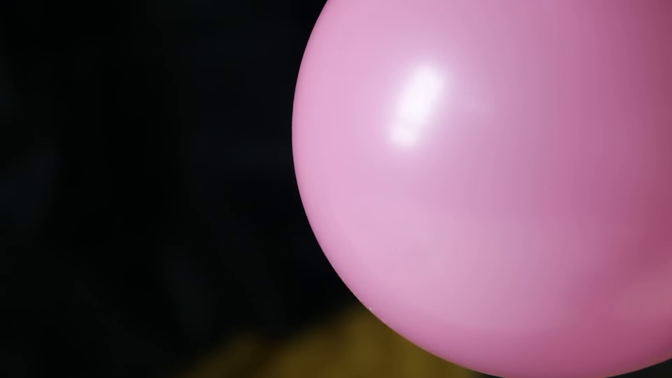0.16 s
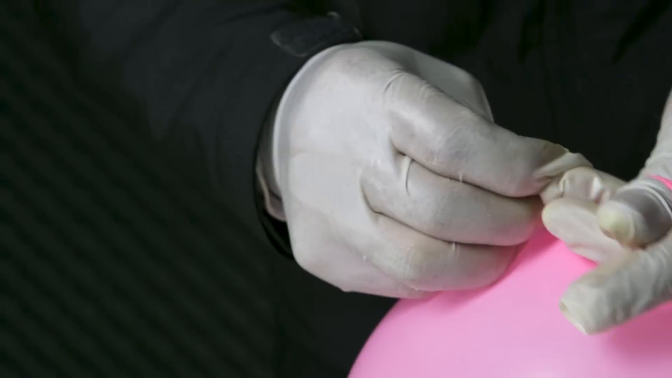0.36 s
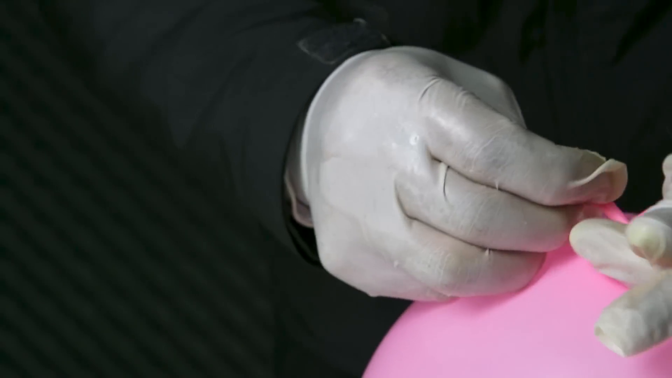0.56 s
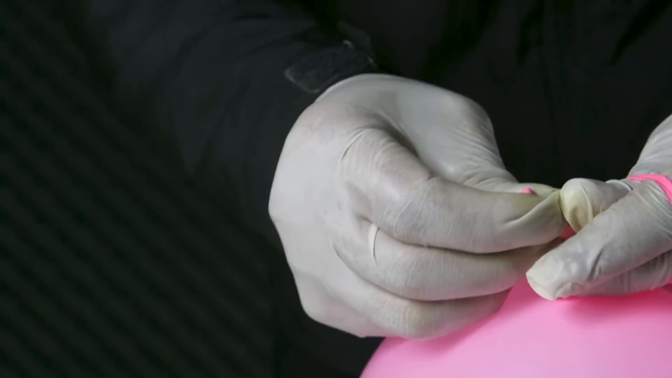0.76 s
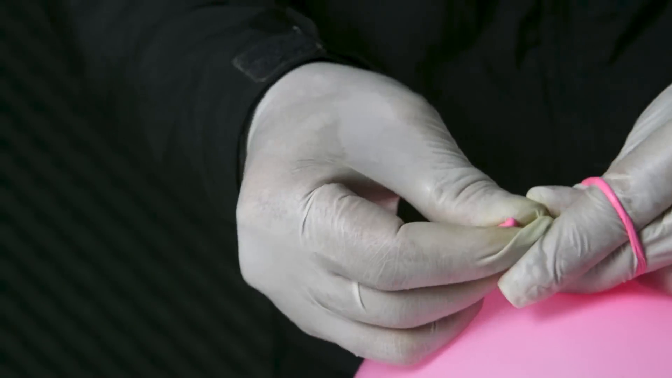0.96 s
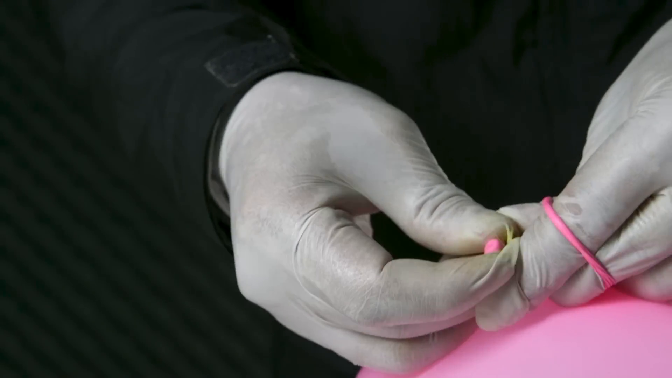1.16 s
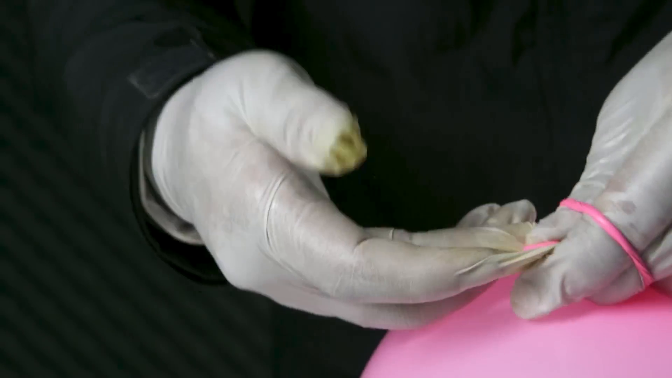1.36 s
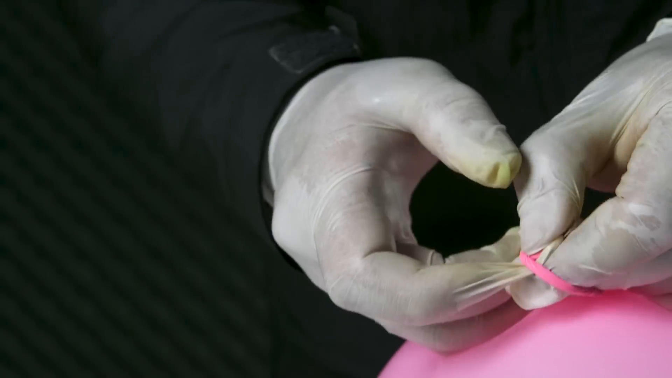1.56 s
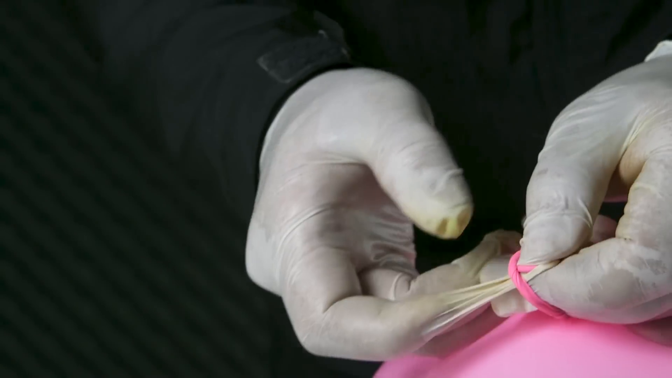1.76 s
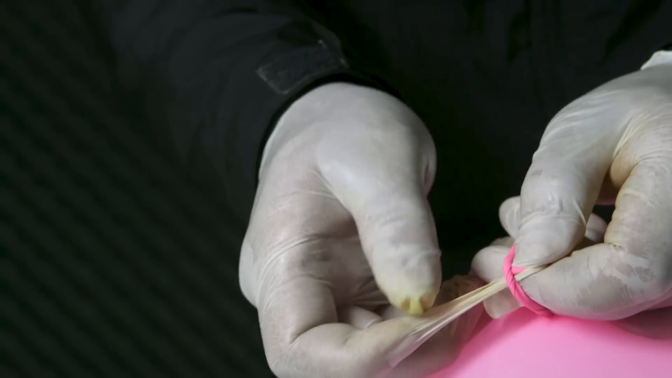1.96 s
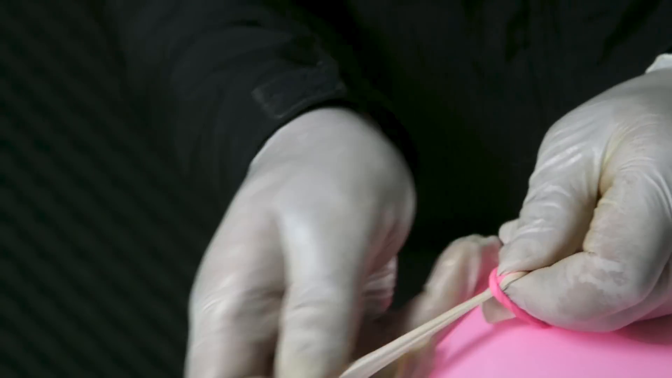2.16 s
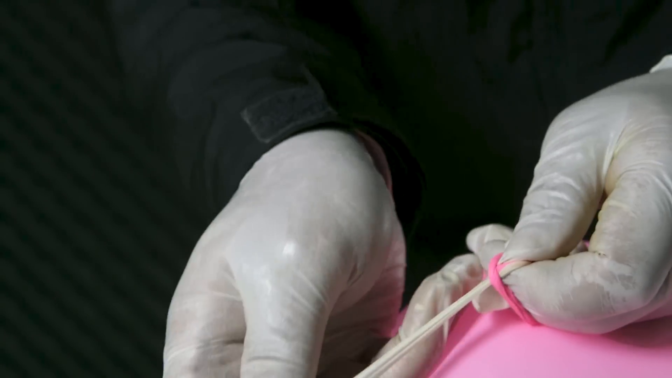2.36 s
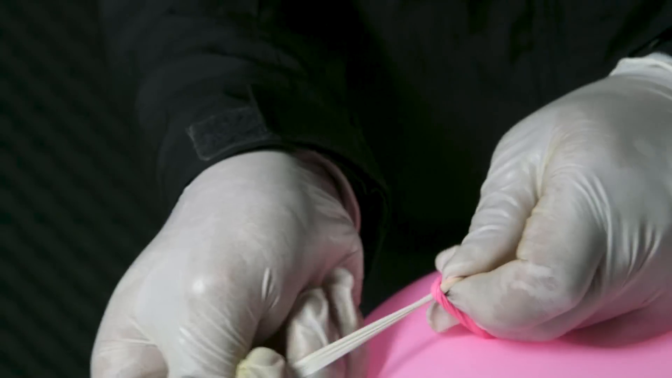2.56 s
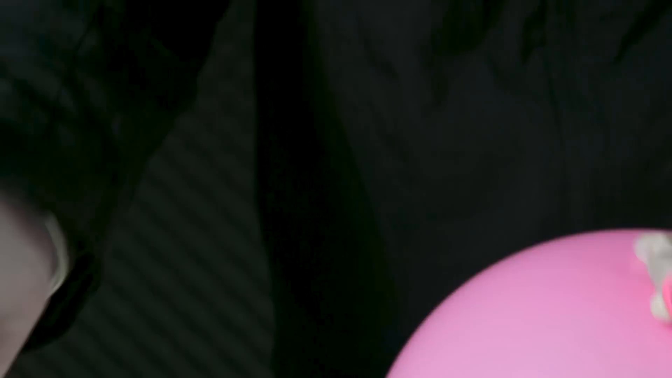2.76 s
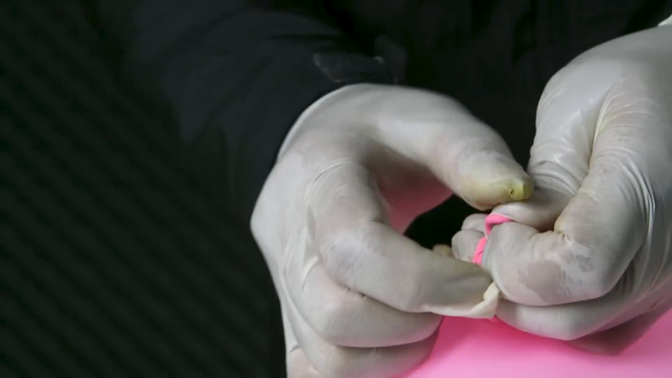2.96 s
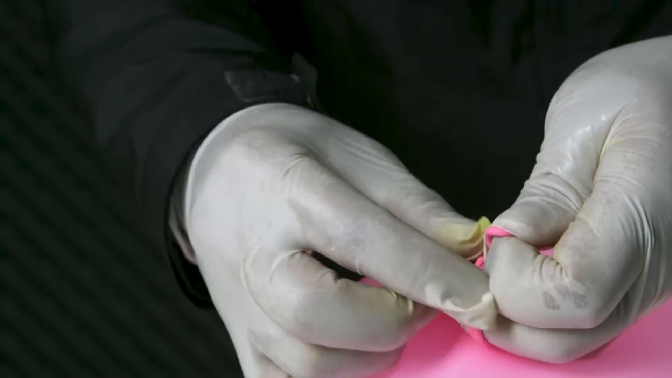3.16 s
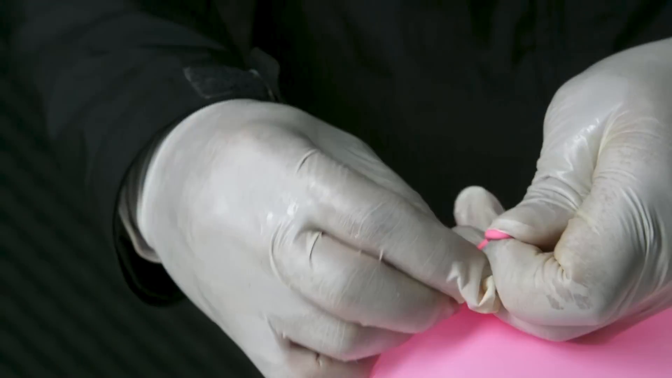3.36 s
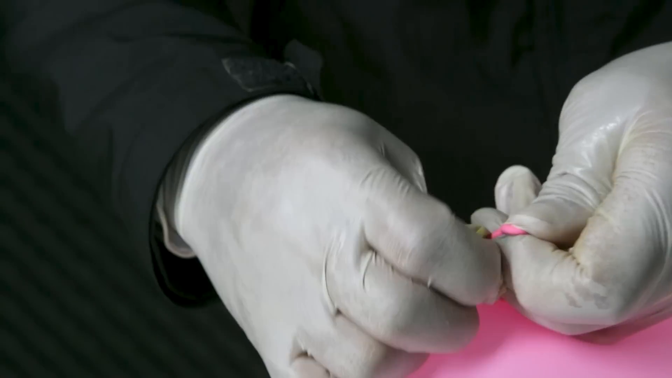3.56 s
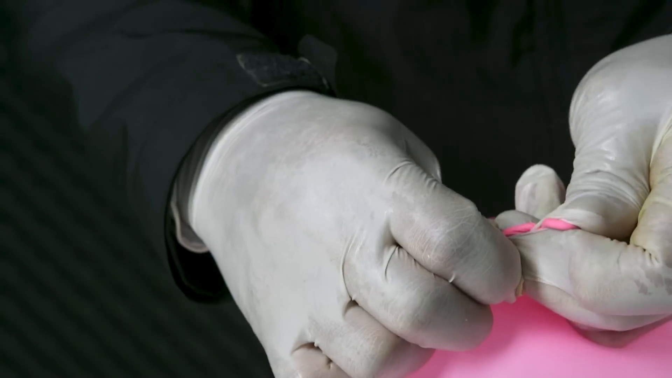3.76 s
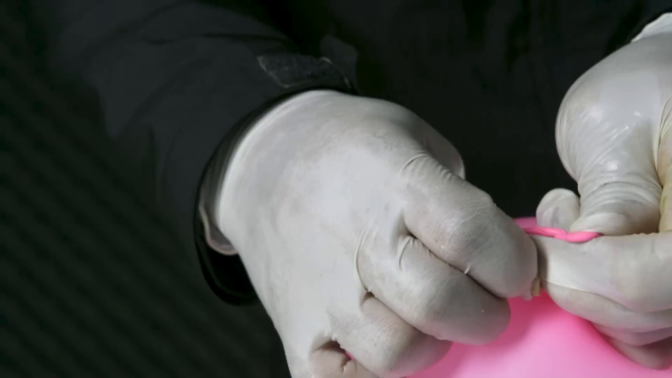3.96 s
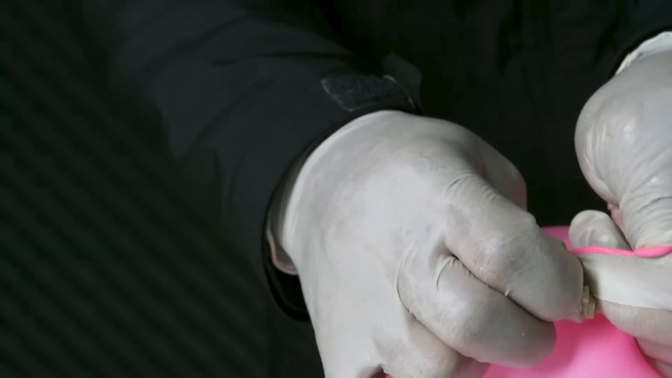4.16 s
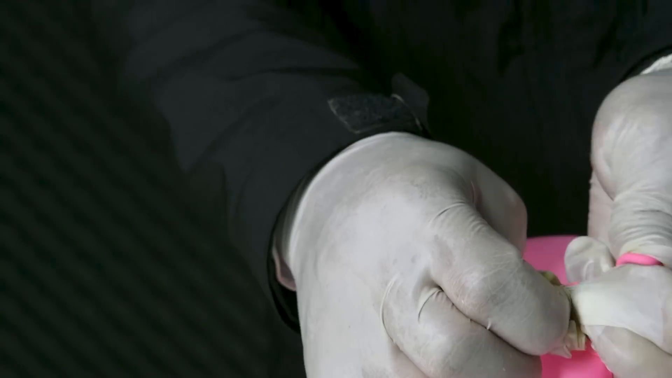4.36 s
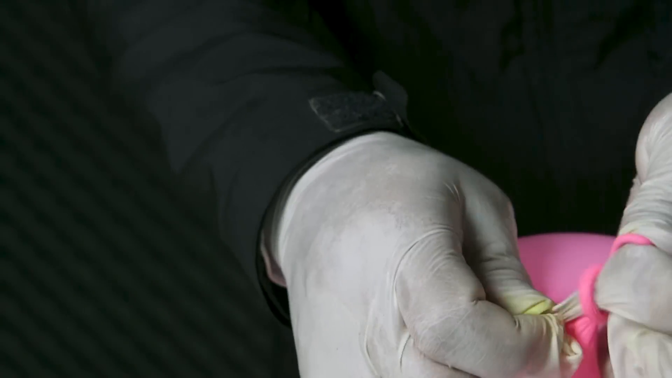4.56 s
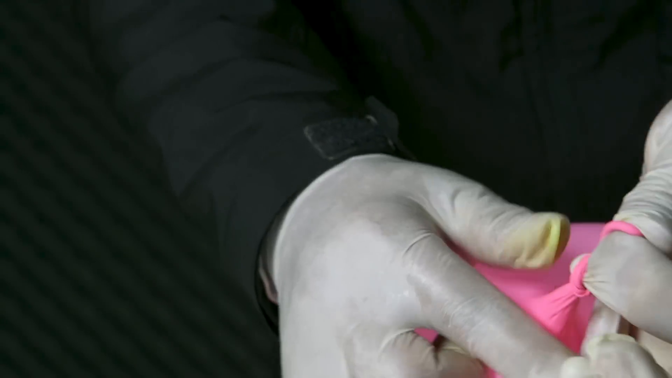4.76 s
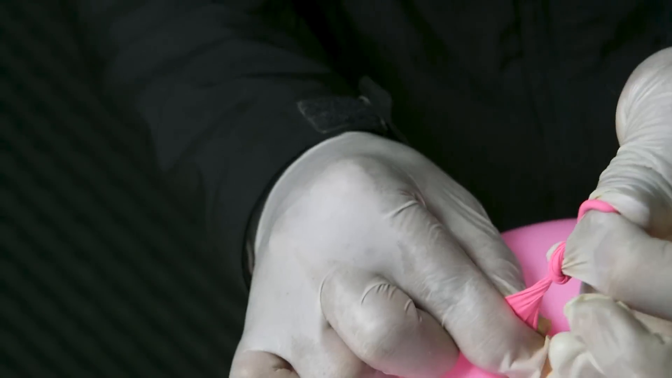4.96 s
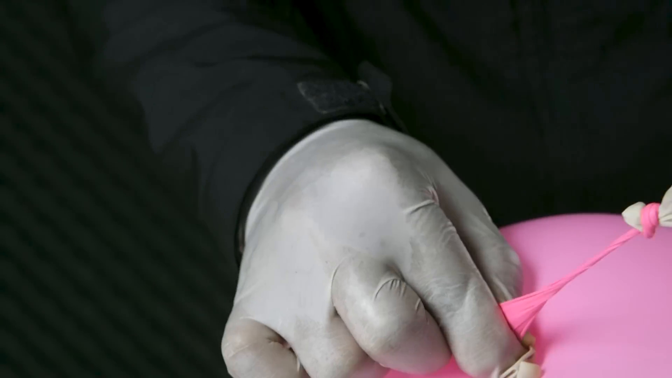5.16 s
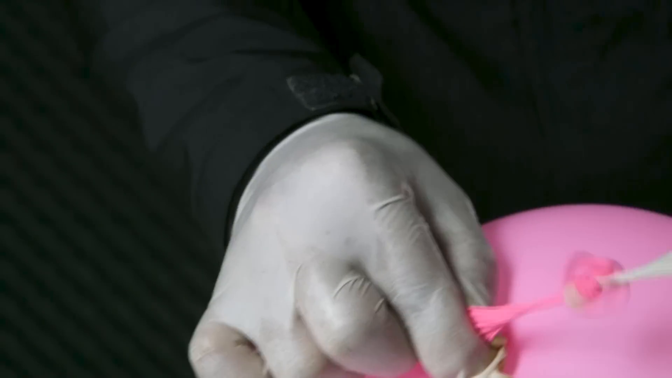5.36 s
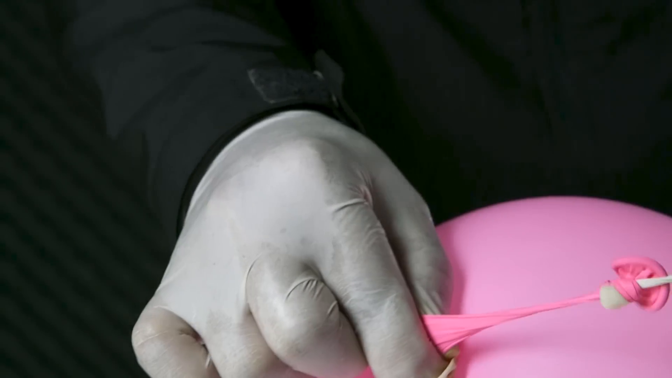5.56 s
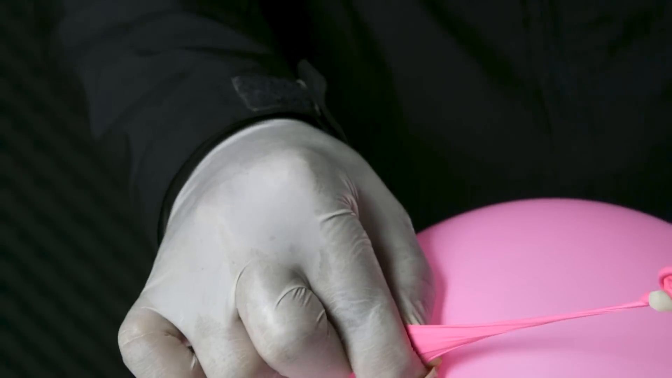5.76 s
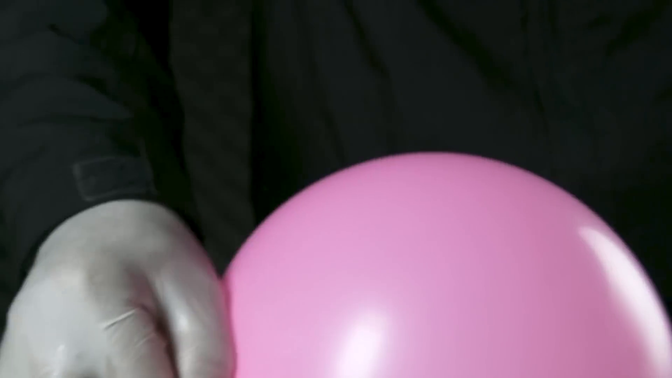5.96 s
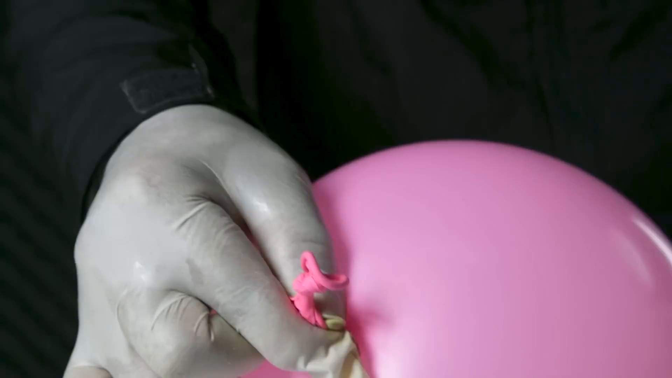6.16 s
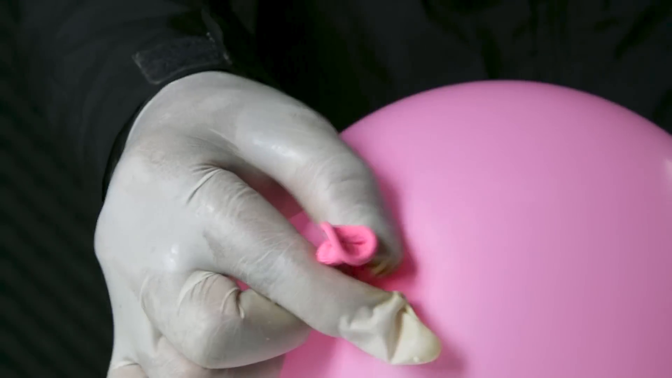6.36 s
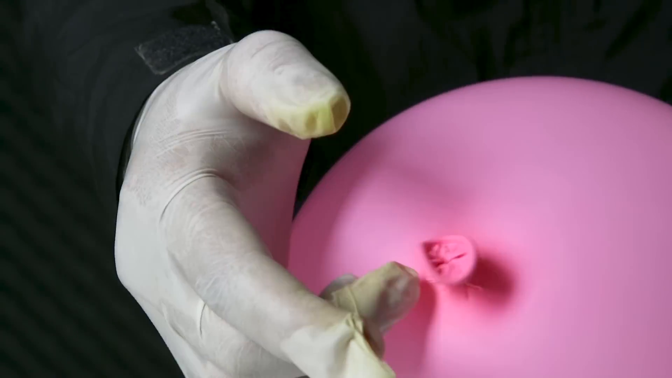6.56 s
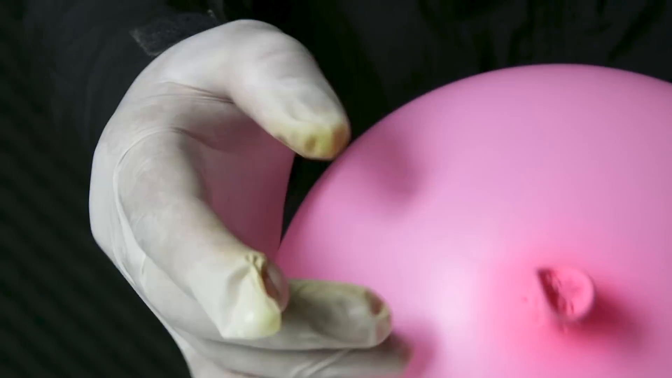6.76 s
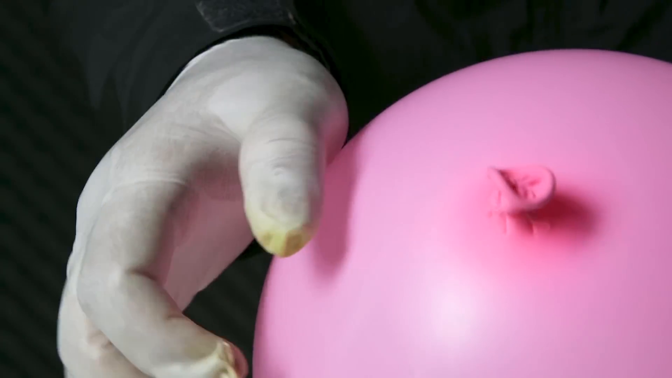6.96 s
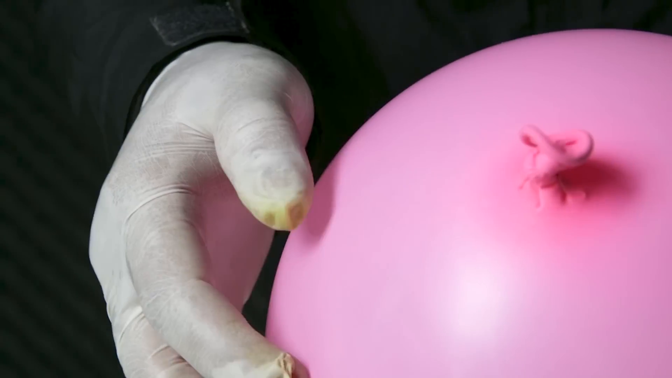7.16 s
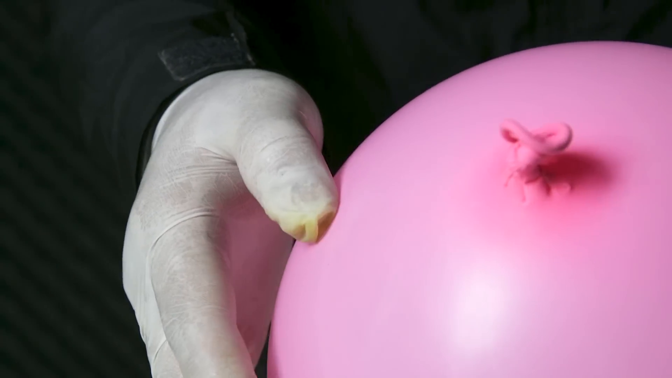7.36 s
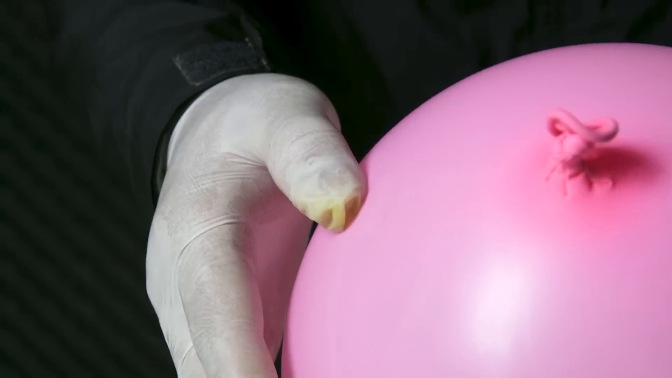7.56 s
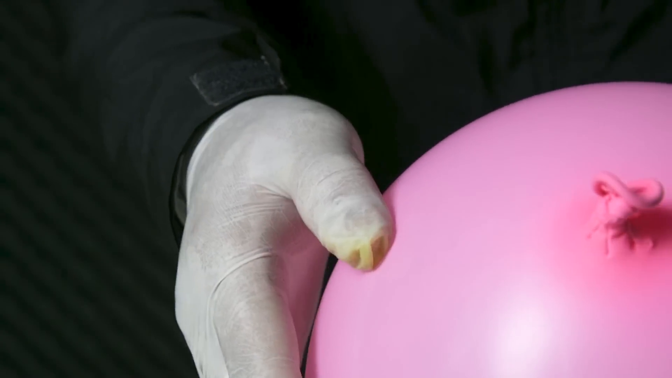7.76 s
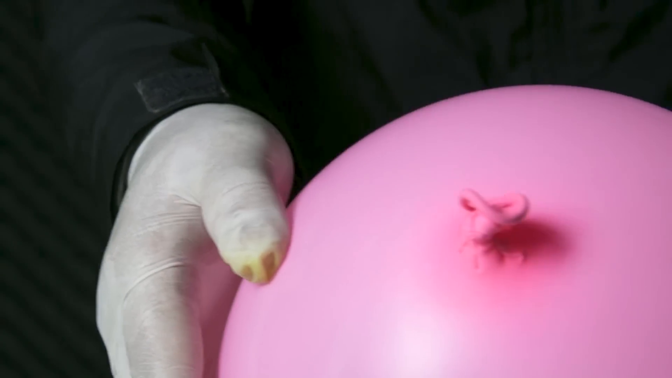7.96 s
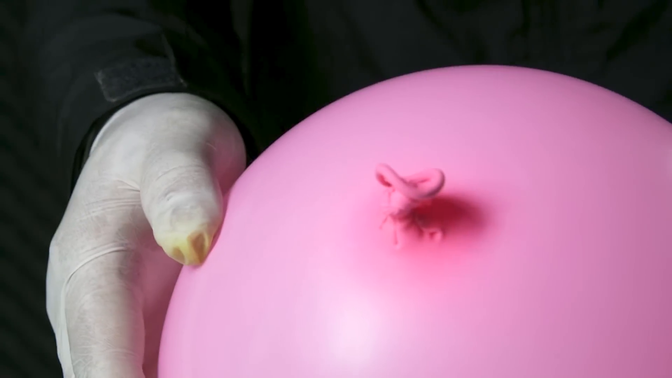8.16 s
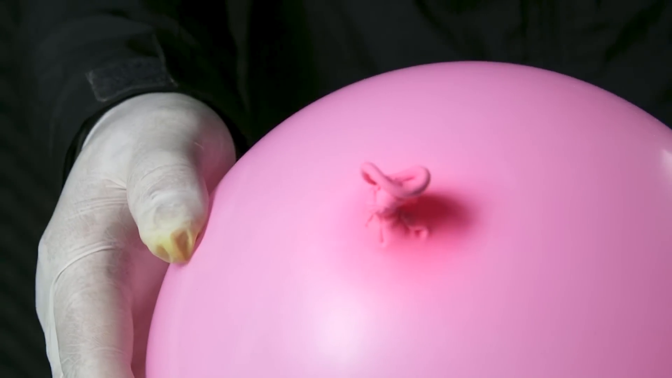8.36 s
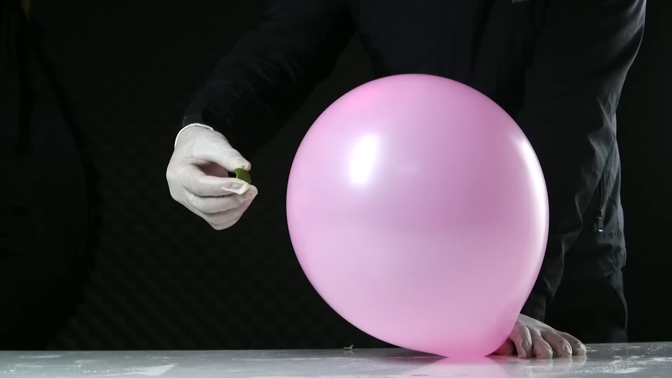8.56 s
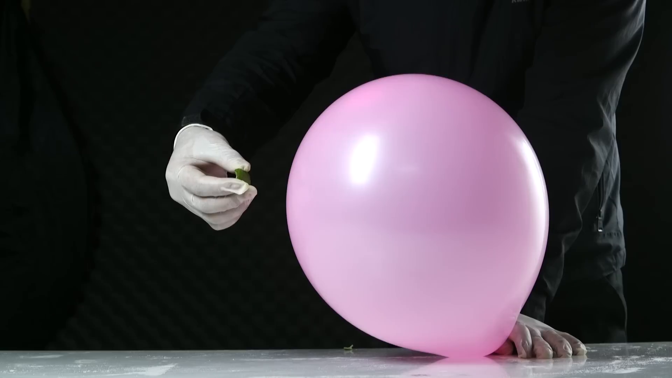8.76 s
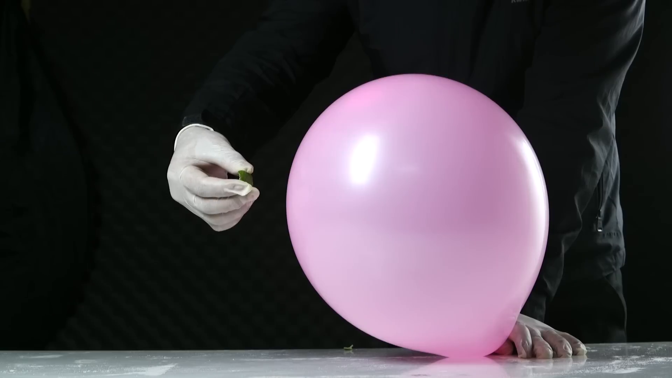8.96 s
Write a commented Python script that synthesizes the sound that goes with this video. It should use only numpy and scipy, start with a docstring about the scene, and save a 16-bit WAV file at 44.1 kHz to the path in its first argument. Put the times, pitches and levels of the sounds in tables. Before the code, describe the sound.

Thin rubber gloves rustle, tick and snap as someone knots a blown-up balloon, heard up close in a quiet, dry room. Scattered cracks build to a busy cluster, with bumps that make the air inside ring briefly. A glove tip whips free with a tiny squeak and a low thump. Fingertips then knock and creak faintly across the tight skin over a soft handling rumble, and everything settles.

```python
"""Tying a balloon in rubber gloves

Hands in thin rubber gloves knot the neck of a blown-up balloon, close by in a small dry room.
The gloves crinkle, peel and snap. Fingers bump and drag on the tight skin, which rings with the air
inside. A glove tip caught in the knot whips free, and the balloon is left bobbing."""
import sys
import numpy as np
from scipy import signal
from scipy.fft import rfft, irfft, next_fast_len
from scipy.io import wavfile
from scipy.ndimage import map_coordinates

SR = 44100
rng = np.random.default_rng(int(sys.argv[2]) if len(sys.argv) > 2 else 0)


def unload_wav(signal):
    """Save mono or channel-first audio to the path in sys.argv[1] as 16-bit WAV at rate SR, clipped to [-1, 1]."""
    wavfile.write(
        sys.argv[1],
        SR,
        np.round(np.clip(np.atleast_2d(signal).T, -1, 1) * 32767).astype(np.int16),
    )


N = 396900  # 9 s

# how hard the fingers work the rubber: t/s, effort/dB
EFFORT = [(0, -58.5), (.36, -72), (.6, -70.5), (1.1, -63.5), (1.55, -63.5), (1.73, -72), (2.38, -72.5),
          (2.72, -62.5), (3.33, -62), (3.58, -69.5), (3.95, -67), (4.18, -70), (4.65, -60), (5.25, -69.5),
          (5.68, -73.5), (6.02, -64.5), (6.3, -72), (6.7, -68), (7.58, -84), (9, -90)]
# how hard they press on the balloon: t/s, pressure/dB
PRESSURE = [(0, -61.5), (.33, -67), (.55, -62), (.8, -68), (1.5, -67.5), (2.05, -70), (2.55, -61),
            (3.45, -66.5), (4.1, -61.5), (4.5, -69), (4.98, -55.5), (5.3, -71.5), (5.55, -67), (5.8, -71.5),
            (6.15, -63.5), (6.35, -66.5), (7.05, -60.5), (7.7, -72), (8.1, -73.5), (9, -93)]
EASY_DB = -65.5  # effort and pressure of ordinary handling
CREEP_S = 0.006  # a faint rasp leads each snap by this long


def snap(t60, db, slack_db):
    """Stretched rubber creeps, then lets go: a bright crack, a flap, a slower slap and a low recoil."""
    # tone colours of the crack, the loose rubber's flap and its slap: f/Hz, level/dB
    crack_colour = [(3500, -44.5), (5500, -3.5), (7500, -3.5), (10000, -3), (13000, -4), (16000, -6.5)]
    flap_colour = [(900, -29.5), (1700, -5.5), (2500, 3.5), (3400, 1), (4200, -0.5), (5300, -4),
                   (8000, -37.5)]
    slap_colour = [(25, -37.5), (60, -20), (300, -8.5), (600, -2), (1000, 0), (1600, -1.5), (3000, -20)]
    t = np.arange(4096) / SR - CREEP_S
    after = np.maximum(t, 0)
    creep = amp(-33) * fade(np.abs(t), 0.014) * (t < 0)
    release = 1 - np.exp(-after / (t60 / 40 + 0.00005))  # longer pieces take longer to let go

    def burst(length, colour):
        """A dying rasp of the given colour."""
        rasp = np.tanh(2 * rng.standard_normal(len(t)))
        shape = creep + release * fade(after, length)
        return packet(through(rasp * shape, response(colour)))

    flap = amp(-0.5 + 0.35 * slack_db) * burst(t60, flap_colour)
    crack = burst(t60, crack_colour)
    slap = amp(slack_db) * burst(t60 + 0.009, slap_colour)
    recoil = amp(-26) * packet(np.sin(2 * np.pi * 85 * after) * fade(after, 0.06))  # balloon jerks back
    return amp(db) * (crack + flap + recoil + slap)


def snaps():
    """The gloves and the balloon's neck slip off fingers and off each other."""
    # tight rubber cracks, slack rubber also flaps and slaps: t/s, t60/s, crack level/dB, slack/dB
    releases = [(0.028, 0.013, -30, -25), (0.0558, 0.037, -36, 2), (.063, 0.014, -24.5, -29),
                (0.212, 0.0027, -49, 14), (.3623, 0.0025, -21.5, -53), (0.4085, 0.0046, -31, -11),
                (.4866, 0.0058, -45.5, 7.5), (0.5433, 0.0029, -31, -5), (0.5486, 0.0022, -13.5, -31.5),
                (0.6566, 0.0041, -40.5, -15), (.7198, 0.0058, -46, 9.5), (.9663, 0.004, -33.5, -26),
                (1.2403, .01, -36, -47), (1.268, 0.021, -37.5, -18), (1.2742, 0.0028, -23.5, -23.5),
                (1.3205, .012, -31.5, -48), (1.3356, 0.0023, -18.5, -32), (1.3455, 0.0014, -25, -35),
                (1.4191, 0.0012, -10, -20), (1.5457, 0.012, -27.5, -15.5), (1.56, .0056, -38.5, 0.5),
                (1.6108, 0.0099, -37.5, -5), (1.6551, 0.014, -31.5, -8.5), (1.9808, .018, -60, 16),
                (2.016, 0.0015, -39, -36), (2.2414, 0.001, -21.5, -8.5), (2.2456, 0.039, -31.5, -28),
                (2.4338, .0094, -44, -4), (2.7483, .0042, -9, -25.5), (2.7498, 0.0024, -18, -18.5),
                (2.85, .009, -45, 1.5), (2.877, .038, -43, 4.5), (2.9028, 0.013, -43.5, 7.5),
                (3.0348, 0.007, -35, -16), (3.2511, 0.0067, -36.5, -57), (3.327, 0.0051, -49.5, 10.5),
                (3.3507, 0.0068, -39.5, -10.5), (3.3914, 0.035, -32.5, -5), (3.4998, 0.0052, -39.5, -22),
                (3.5878, 0.011, -48, 8.5), (3.9305, 0.0049, -41, -20), (4.0215, 0.019, -40, 1.5),
                (4.052, .0026, -46, -14), (4.3287, 0.019, -43.5, -14), (4.4719, 0.013, -29, -7.5),
                (4.48, 0.0066, -14, -14.5), (4.572, .0022, -37.5, -22.5), (4.602, .023, -42.5, -3),
                (4.6124, 0.029, -24, 1), (4.6506, .014, -44, 3.5), (4.6597, 0.016, -15, 3),
                (4.7065, .007, -23.5, -18), (4.7282, 0.0066, -24, 10.5), (4.736, .019, -27.5, -3),
                (4.808, 0.011, -43, 4), (4.8209, 0.0068, -25, -0.5), (4.9803, 0.011, -44.5, 1.5),
                (5.1207, 0.0033, -44.5, -6), (5.1754, .0041, -48.5, 2), (5.352, 0.0028, -38, -26),
                (5.4178, .005, -26, -41), (5.434, 0.0052, -23, -13), (5.4365, 0.013, -22.5, -12),
                (5.4422, .0051, -28.5, 0.5), (5.8052, 0.0059, -47.5, -0.5), (5.9332, 0.0025, -26, -9.5),
                (5.9358, .015, -3, -17), (6.3632, .0033, -48.5, -27), (6.4949, 0.023, -36, 1.5),
                (6.528, 0.028, -30, -3), (6.5451, 0.016, -19, 0), (6.7527, 0.021, -43.5, -2.5),
                (6.8694, 0.013, -48.5, 0), (7.0634, .008, -54.5, 10), (7.2298, .022, -44.5, -2),
                (7.412, 0.0066, -49.5, 3), (7.4265, .012, -47.5, -4), (7.608, 0.021, -56, -1),
                (8.392, .032, -59, 7)]
    out = np.zeros(N)
    for start, t60, db, slack_db in releases:
        add(out, start - CREEP_S, snap(t60, db, slack_db))
    return out


def ticks(count=60):
    """Small folds let go at odd moments, louder the harder the fingers work."""
    out, effort_db = np.zeros(N), curve(EFFORT)
    for k in range(count):
        at = int((k + rng.random()) * N / count)
        db = effort_db[at] + 15.5 + rng.uniform(-1, 1)
        add(out, at / SR, snap(t60=0.0048, db=db, slack_db=-12.5 + rng.uniform(-7, 7)))
    return out


def bumps():
    """A dent in the skin springs back, sinking in pitch as it relaxes, and sets the air ringing."""
    # fingers and knot hit the balloon: t/s, level/dB, f/Hz that the pitch slides through, t60/s
    hits = [(.212, -20, 206.6, .16), (.2143, -30, 479, .094), (.549, -26.5, 906, 0.062),
            (.72, -47, 654, 0.091), (2.2409, -38.5, 1023, 0.12), (2.7485, -30, 670, 0.13),
            (2.97, -35, 270, 0.034), (4.052, -29, 96, 0.61), (4.6601, -12.5, 680, .035),
            (4.7058, -27.5, 930, 0.039), (4.7275, -17, 760, .026), (4.7366, -21, 458, 0.034),
            (4.8202, -16, 1090, 0.027), (4.987, -39, 240, 0.1), (5.9355, -15, 330, 0.087),
            (6.427, -26.5, 168, 0.04), (6.4978, -23.5, 410, 0.019), (6.5455, -18.5, 496, 0.1),
            (6.547, -15, 258, 0.05), (6.548, -20.5, 125, 0.084), (6.778, -32, 257, .04),
            (6.8694, -27.5, 239, 0.011), (6.871, -31.5, 766, 0.047), (8.39, -38, 190, 0.072)]
    out, t = np.zeros(N), np.arange(SR // 3) / SR
    for start, db, hz, t60 in hits:
        pitch = hz * (0.85 + 0.25 * np.exp(-t / 0.0084))
        dent = np.sin(2 * np.pi * np.cumsum(pitch) / SR) * fade(t, t60)
        band = [(hz / 6, -21), (hz / 2, -6), (hz, 0), (hz * 2, -6), (hz * 5, -26), (hz * 20, -60)]
        ripples = through(rng.standard_normal(len(t)) * fade(t, 0.51 * t60), response(band))
        air = air_ring(t, hz, octaves=1.0) * (1 - np.exp(-t / 0.00054))
        add(out, start, amp(db) * packet(packet(dent) + packet(ripples) + amp(-11) * packet(air)))
    return out


def air_ring(t, touch_hz, octaves):
    """The trapped air rings most near the pitch of the touch, a little differently each time."""
    # natural tones of the air inside: f/Hz, level/dB, t60/s
    air_tones = [(190.5, -3, 0.24), (290.7, -9.5, 0.18), (378, -10.5, 0.017), (449, -4, 0.21),
                 (549, -11.5, 0.31), (665, -5.5, 0.14), (853, -4, 0.15), (890, 3.5, 0.069),
                 (1003, -3, 0.092), (1170, -10.5, 0.067), (1480, -8.5, 0.11), (1455, -3.5, 0.089)]
    hz, db, t60 = np.transpose(air_tones)[:, :, None]
    strength, squeeze, phase = rng.standard_normal((3,) + hz.shape)
    weight = amp(db + 2 * strength) / (1 + (np.log2(hz / touch_hz) / octaves) ** 2)
    pitch = hz * (1 + 0.0076 * squeeze)
    return np.sum(weight * np.sin(2 * np.pi * (pitch * t + phase)) * fade(t, t60), axis=0)


def bobbing(start=5.945, wobble_hz=53.7, air_hz=190.0):
    """The freed balloon wobbles with a deep tone while the air inside hums."""
    out, t = np.zeros(N), np.arange(SR) / SR
    swing = 1 - np.exp(-(t / 0.03) ** 2)
    air_rise = 1 - np.exp(-t / 0.005)
    add(out, start, amp(-30.5) * np.sin(2 * np.pi * wobble_hz * t) * swing * fade(t, 0.62))
    add(out, start, amp(-35.5) * np.sin(2 * np.pi * air_hz * t) * air_rise * fade(t, 0.42))
    return out


def squeaks():
    """For a moment the rubber's tiny slips fall nearly into step and make a rough, sinking tone."""
    # squeaks and scuffs: t/s, level/dB, middle f/Hz, length/s
    scuffs = [(1.338, -46, 3120, 0.0063), (1.609, -40.5, 2660, 0.0042), (2.829, -46, 3960, 0.0065),
              (3.237, -52.5, 4170, 0.049), (4.368, -52.5, 4320, 0.077), (5.857, -52.5, 3290, 0.0066),
              (5.9328, -15.5, 3349, 0.0086), (6.091, -63.5, 3000, 0.22), (6.436, -37, 5900, 0.003),
              (7.197, -70, 3100, .2), (7.937, -60.5, 2060, 0.023), (8.643, -61.5, 2374, .037)]
    out = np.zeros(N)
    waver = 0.15 * wobble(2600)
    flutter = amp(3 * wobble(700))
    for start, db, hz, length in scuffs:
        progress = np.linspace(0, 1, max(int(length * SR), 2))
        span = slice(int(start * SR), int(start * SR) + len(progress))
        pitch = hz * (1 - 0.13 * (progress - 0.5) + waver[span])
        tone = np.sin(2 * np.pi * np.cumsum(pitch) / SR)
        add(out, start, amp(db) * flutter[span] * np.sin(np.pi * progress) * tone)
    return out


def gloves():
    """Wrinkles part in clumps of tiny ticks over the hiss of sliding rubber, louder as a glove peels."""
    # glove peels off glove: start/s, end/s, relative crinkle level/dB, relative sliding level/dB
    peels = [(0.045, 0.066, -51, -67), (0.48, 0.553, -53, -55.5), (0.658, .74, -50.5, -57),
             (0.927, 0.989, -47.5, -59), (1.247, 1.28, -54, -65), (1.318, 1.418, -46.5, -61),
             (1.531, 1.56, -42, -57), (1.595, 1.687, -46, -56), (1.892, 1.922, -58, -52.5),
             (2.854, 2.915, -44, -54), (3.172, 3.334, -53, -80), (3.408, 3.528, -56.5, -57.5),
             (3.58, 3.703, -60.5, -55), (4.3, 4.449, -56, -57), (4.551, 4.635, -48.5, -56),
             (4.977, 5.139, -56.5, -55.5), (5.404, 5.452, -45, -53), (5.945, 6.026, -54, -57),
             (6.418, 6.558, -42.5, -50), (6.558, 6.659, -58, -60)]
    # tone colours of crinkling and sliding: f/Hz, level/dB
    crinkle_colour = [(1500, -25), (4000, -5), (6500, -4.5), (10000, -1.5), (14000, -0.5), (16000, -4.5)]
    slide_colour = [(500, -7.5), (1200, 0.5), (2000, 0.5), (3000, 1), (4500, -5), (6500, -11.5),
                    (12000, -27)]
    effort_db, press_db = curve(EFFORT), curve(PRESSURE)
    crinkle_gain = amp(effort_db)
    slide_gain = amp(-68 + 0.4 * (effort_db - EASY_DB) + 0.44 * (press_db - EASY_DB))
    for start, end, crinkle_db, slide_db in peels:
        swell = stroke(start, end)
        crinkle_gain = np.hypot(crinkle_gain, amp(crinkle_db - 6.5) * swell)
        slide_gain = np.hypot(slide_gain, amp(slide_db - 4) * swell)
    tick_shape = fade(np.arange(SR // 100) / SR, 0.002)
    clumps = amp(1.8 * wobble(45))

    def rasp(colour, per_second):
        """Each wrinkle or fold that parts gives a very short puff of noise."""
        wrinkles = grains(per_second, spread_db=5.5)
        parting = np.sqrt(np.abs(through(wrinkles ** 2, tick_shape)))
        return unit(through(clumps * parting * rng.standard_normal(N), response(colour)))

    crinkle = amp(0.47) * rasp(crinkle_colour, per_second=130) + amp(-3) * noise(crinkle_colour)
    slide = amp(-2) * rasp(slide_colour, per_second=70) + amp(-4) * noise(slide_colour)
    return crinkle_gain * crinkle + slide_gain * slide


def drag():
    """Fingertips stick and slip, louder with pressure; every slip taps the skin and the air behind it."""
    # a finger creaks across the balloon: start/s, length/s, level/dB, slips per second
    creaks = [(4.754, .06, -48, 160), (6.441, .037, -46, 260), (6.513, 0.049, -47.5, 320),
              (6.77, 0.033, -48, 200), (6.833, 0.077, -53.5, 300), (6.912, 0.067, -54, 200),
              (7.014, .018, -49, 240), (7.049, .04, -53, 170), (7.153, 0.0077, -51, 330),
              (7.17, .04, -45.5, 170), (7.22, 0.0181, -45.5, 230), (7.247, 0.064, -49.5, 300),
              (7.351, 0.015, -47.5, 270), (7.409, 0.0178, -44, 480), (7.505, 0.1216, -58, 220),
              (7.813, 0.0561, -51.5, 240)]
    # tone colour of the tapped skin: f/Hz, level/dB
    skin_colour = [(100, -13), (240, 2), (430, 2), (650, -2.5), (1100, -10.5), (2500, -24), (8000, -35.5)]
    force = amp(curve(PRESSURE) + 1 + 3 * wobble(8)) * grains(per_second=330, spread_db=3)
    for start, length, db, rate in creaks:
        gaps, sizes = np.clip(rng.standard_normal((2, 64)), -2, 2)
        after = np.cumsum(np.append(0, amp(2.5 * gaps[1:]))) / rate
        held = np.clip((length - after) * rate, 0, 1)  # the last slip is weaker
        at = np.round((start + after) * SR).astype(int)
        force[at] += amp(db + 2 * sizes) * held * np.sqrt(SR / rate)
    skin = response(skin_colour)
    ring = air_ring(np.arange(SR // 3) / SR, touch_hz=700, octaves=1.3)
    air = through(np.pad(skin, (0, SR // 3)), ring)
    return through(force, unit_energy(skin)) + amp(-16) * through(force, unit_energy(air))


def grip():
    """The held balloon rumbles as the hands work and booms at a wandering pitch; shoves swell both."""
    # a hand shifts its grip and shoves the balloon: middle t/s, length/s, level/dB
    shoves = [(0.078, 0.062, -46), (.23, 0.12, -50.5), (1.587, 0.46, -53.5), (2.252, 0.17, -50),
              (2.68, 0.25, -53), (2.98, 0.13, -49), (4.085, 0.31, -51.5), (4.473, 0.44, -52.5),
              (5.52, 0.11, -52), (6.45, .12, -49), (6.87, 0.14, -47), (7.102, 0.28, -54.5),
              (8.847, 0.36, -60)]
    # tone colour of the rumble: f/Hz, level/dB
    rumble_colour = [(20, -8.5), (45, -3), (70, 0.5), (95, -5), (140, -2), (200, -4), (320, -19.5),
                     (600, -26.5), (1500, -56)]
    t = np.arange(N) / SR
    shake = amp(-58 + 0.1 * (curve(EFFORT) - EASY_DB))
    for middle, length, db in shoves:
        shake = np.hypot(shake, amp(db) * np.exp(-(2 * (t - middle) / length) ** 2))
    boom_hz = 95 * amp(wobble(2.5))
    phase = 2 * np.pi * np.cumsum(boom_hz) / SR
    boom = unit(wobble(22) * np.sin(phase) + wobble(22) * np.cos(phase))
    return shake * amp(-2.5 + 1.3 * wobble(14)) * (noise(rumble_colour) + boom)


def room(x, near_db, near_t60, walls_db):
    """Hands, body and balloon scatter the sound at once; the soft walls answer later."""
    # how long the walls' echo lasts: f/Hz, t60/s
    wall_decay = [(100, 0.45), (300, 0.36), (800, 0.32), (2500, .13), (14000, 0.1)]
    t, out = np.arange(SR // 3) / SR, x.copy()
    # the echo is drawn afresh every fifth of a second, so the room adds no fixed ringing tone
    hop = SR // 5
    window = signal.windows.hann(2 * hop, sym=False)
    for start in range(0, N, hop):
        near = rng.standard_normal(len(t)) * fade(t, near_t60) * (1 - np.exp(-(t / 0.0016) ** 2))
        hz, times, bands = signal.stft(rng.standard_normal(len(t)), SR, nperseg=256)
        bands *= fade(times, along(wall_decay, hz)[:, None])
        walls = signal.istft(bands, SR, nperseg=256)[1][:len(t)]
        walls *= 1 - np.exp(-(t / 0.006) ** 2)
        echo = amp(near_db) * unit_energy(near) + amp(walls_db) * unit_energy(walls)
        piece = np.pad(x, (hop, 2 * hop))[start:start + 2 * hop] * np.sqrt(window)
        add(out, (start - hop) / SR, signal.fftconvolve(piece, echo)[max(hop - start, 0):])
    return out


def hush():
    """The faint, steady noise of a quiet room and a microphone."""
    # its tone colour: f/Hz, level/dB
    hush_colour = [(12, -42), (20, -6), (60, -5.5), (107, -2.5), (337, -15), (499, -26), (642, -27.5),
                   (698, -27), (2200, -36.5), (14700, -40.5), (16000, -45)]
    return amp(-64) * noise(hush_colour)


def amp(db):
    """Turn decibels into a gain."""
    return np.exp(np.asarray(db) * np.log(10) / 20)


def unit(x):
    """Scale to an average power of 1."""
    return x / np.sqrt(np.mean(x ** 2) + 1e-20)


def unit_energy(x):
    """Scale to a total energy of 1."""
    return x / np.linalg.norm(x)


def packet(x):
    """Scale to the energy of one millisecond at power 1."""
    return x * np.sqrt(SR / 1000 / (np.sum(x ** 2) + 1e-20))


def fade(t, t60):
    """Die away by 60 dB every t60 seconds."""
    return np.exp(-np.log(1000) * t / np.maximum(t60, 1e-4))


def along(points, hz):
    """Read between (f/Hz, value) points on a scale of octaves."""
    freqs, values = np.transpose(points)
    return np.interp(np.log(hz + 1), np.log(freqs + 1), values)


def curve(points):
    """Join (t/s, value) points with straight lines, one value per sample."""
    return np.interp(np.arange(N) / SR, *np.transpose(points))


def stroke(start, end, edge=0.0053):
    """A swell that opens and closes with soft edges."""
    t = np.arange(N) / SR
    return np.clip((t - start) / edge + 0.5, 0, 1) * np.clip((end - t) / (2 * edge) + 0.5, 0, 1)


def wobble(per_second):
    """A smooth curve through evenly spaced random values."""
    values = rng.standard_normal(int(N * per_second / SR) + 4)
    grid = np.arange(0, len(values) - 1, 1 / 8)
    return np.interp(np.arange(N) * per_second / SR, grid, map_coordinates(values, [grid]))


def add(track, start, sound):
    """Mix a sound into the track at a time in seconds."""
    part = track[max(round(start * SR), 0):][:len(sound)]
    part += sound[:len(part)]


def response(colour, size=2048):
    """What a single click becomes in a filter of this tone colour."""
    cepstrum = irfft(np.log(amp(along(colour, np.fft.rfftfreq(size, 1 / SR)))))
    cepstrum[1:size // 2] *= 2  # folded so that nothing sounds before the click
    cepstrum[size // 2 + 1:] = 0
    return irfft(np.exp(rfft(cepstrum)))


def through(x, click_response):
    """Pass x through a filter."""
    return signal.oaconvolve(x, click_response)[:len(x)]


def noise(colour):
    """Steady noise of this tone colour, at power 1."""
    gains = amp(along(colour, np.fft.rfftfreq(N, 1 / SR)))
    return unit(irfft(rfft(rng.standard_normal(N)) * gains, N))


def grains(per_second, spread_db):
    """Tiny random clicks, most of them small and a few large."""
    happens = rng.random(N) < per_second / SR
    size = amp(spread_db * np.clip(rng.standard_normal(N), -2, 2))
    return unit(happens * size * rng.choice([-1, 1], N))


def scene():
    """Everything the hands do sounds close by in the room, over its faint hush."""
    hands = snaps() + ticks() + bumps() + bobbing() + squeaks() + gloves() + drag()
    return (room(hands, near_db=-10.5, near_t60=0.047, walls_db=-18.5) + grip() + hush())[None]


def record(dry):
    """Round off the sharpest peaks and cut the very highest treble."""
    peak_db, top_hz, edge_hz = -1.5, 16400, 700
    rounded = dry / (1 + np.abs(dry / amp(peak_db)) ** 4) ** (1 / 4)
    size = next_fast_len(N + SR // 2)
    passed = np.clip((top_hz - np.fft.rfftfreq(size, 1 / SR)) / edge_hz, 0, 1)
    return irfft(rfft(rounded, size) * passed, size)[..., :N]


dry = scene()
out = record(dry)
unload_wav(out)
```